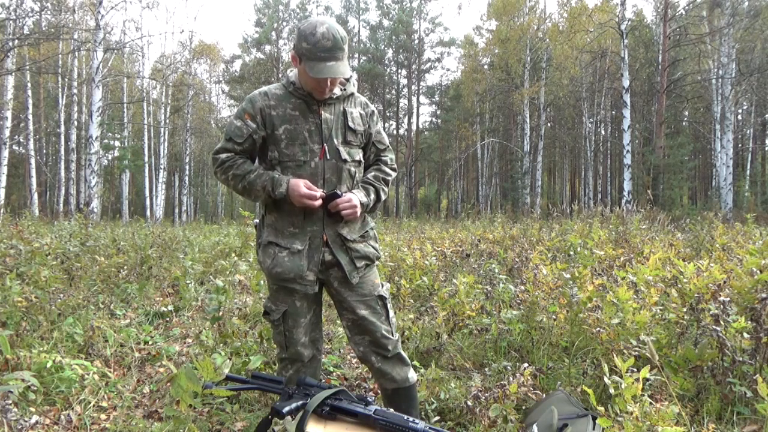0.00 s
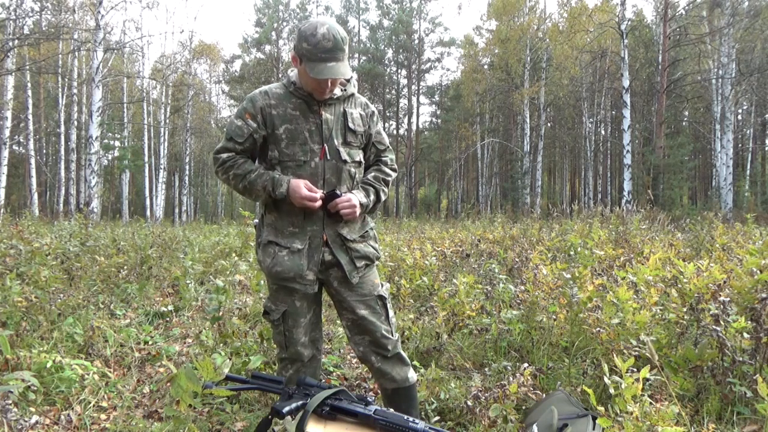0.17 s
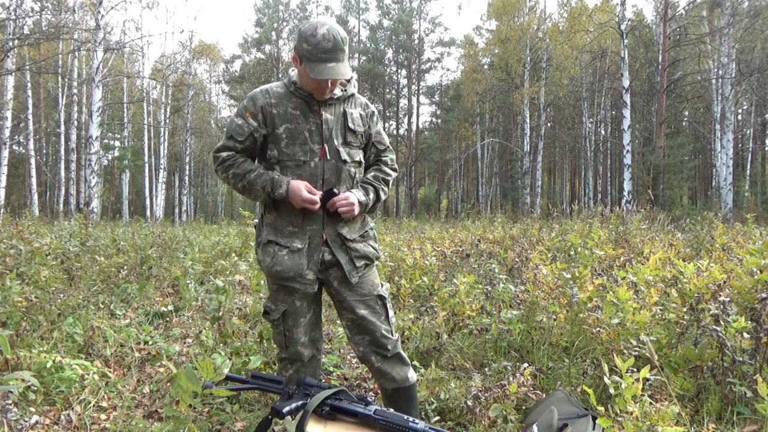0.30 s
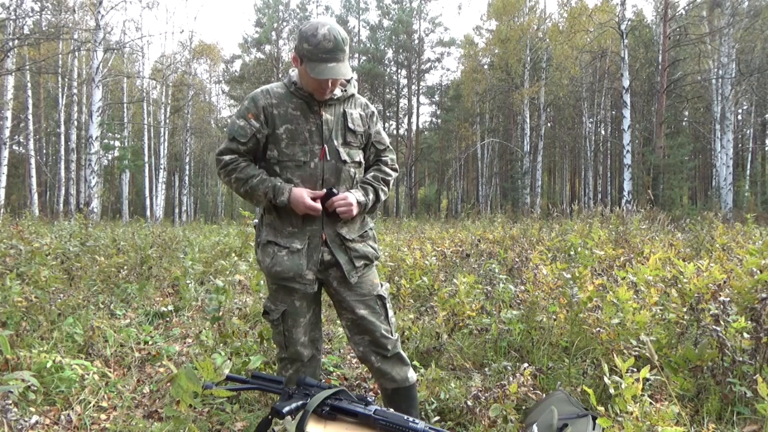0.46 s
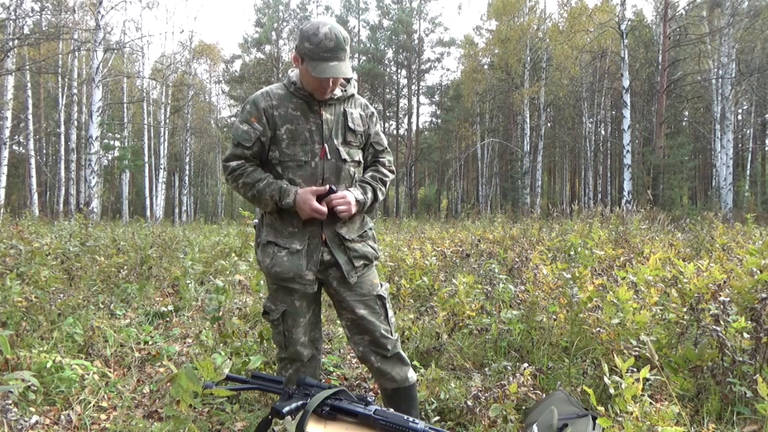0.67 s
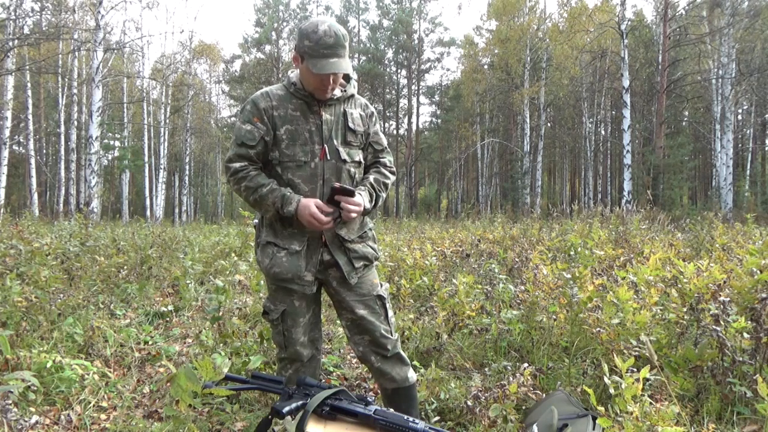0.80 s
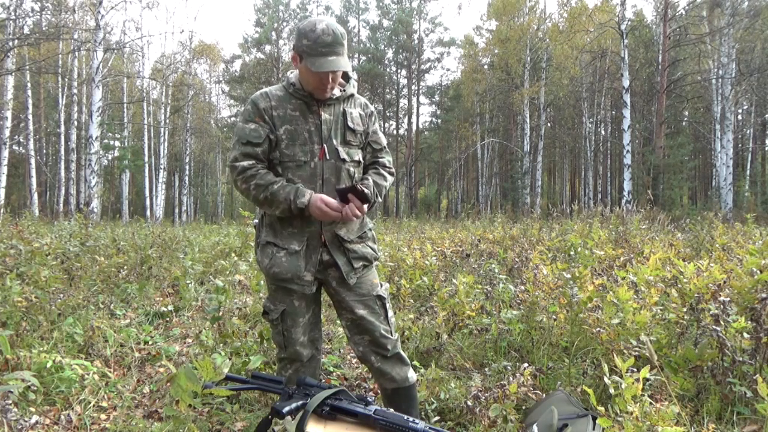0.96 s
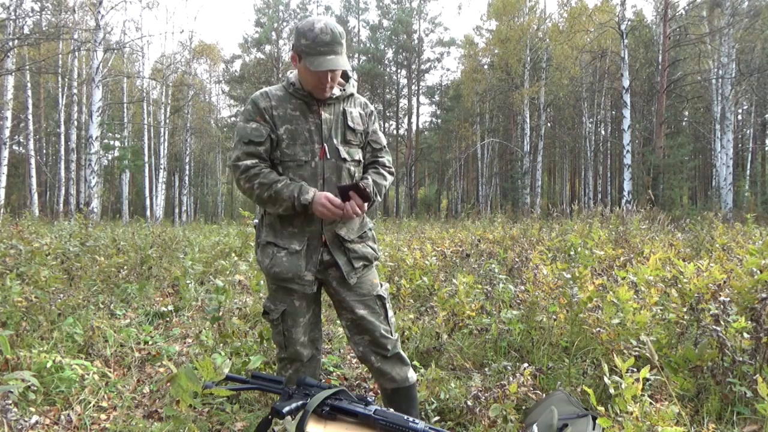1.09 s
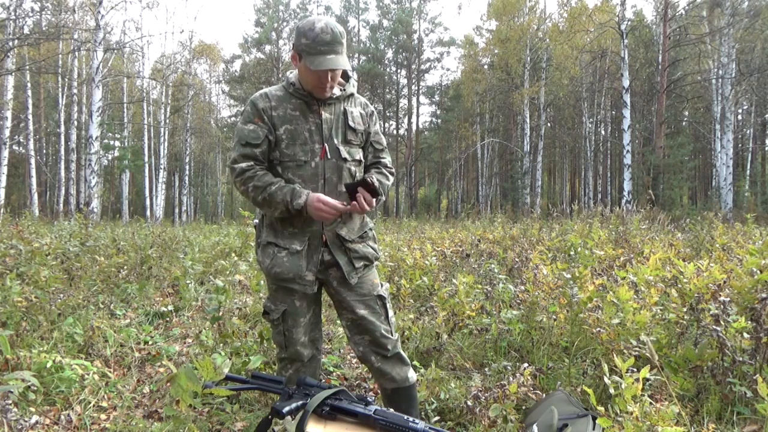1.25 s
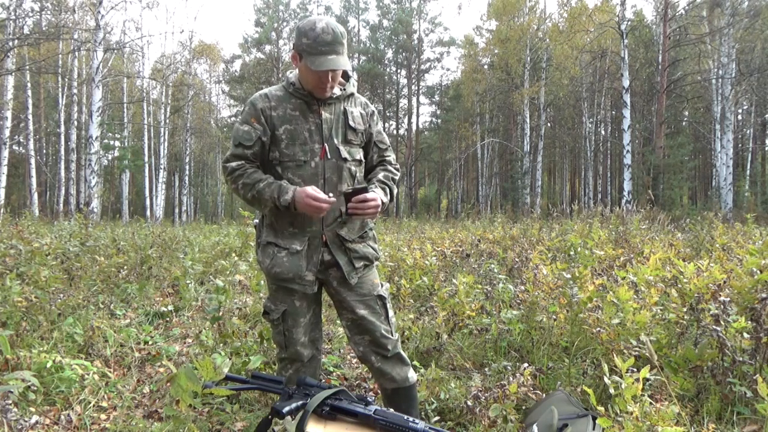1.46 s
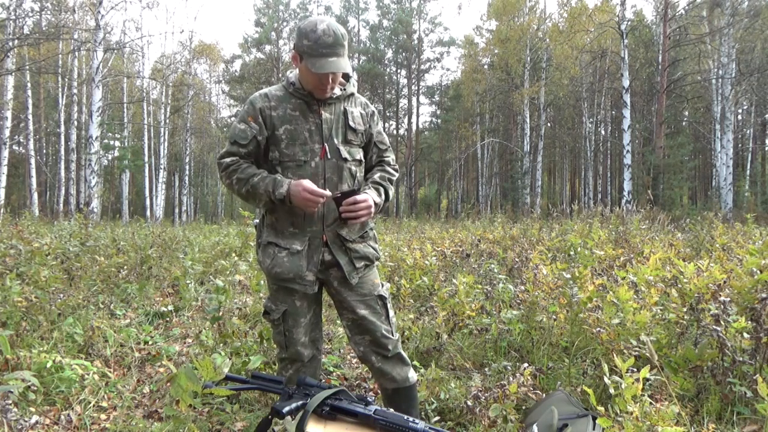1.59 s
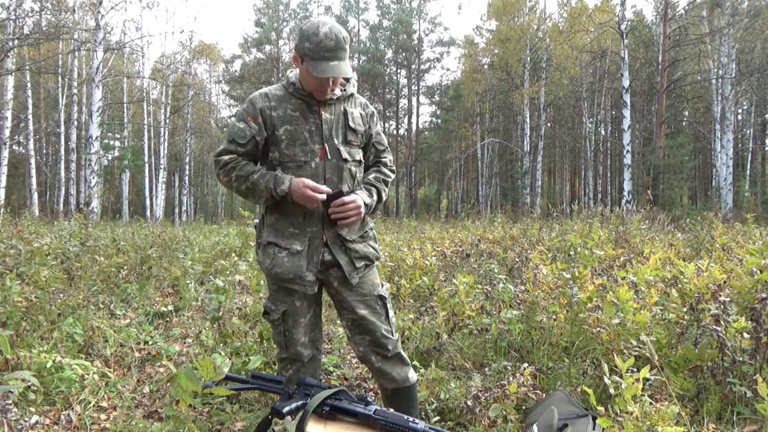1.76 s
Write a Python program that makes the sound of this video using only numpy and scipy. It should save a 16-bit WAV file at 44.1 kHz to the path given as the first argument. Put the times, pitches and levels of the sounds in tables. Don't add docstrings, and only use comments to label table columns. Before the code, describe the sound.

A brass cartridge is pressed into a steel magazine: small scrapes and hollow knocks, then four hard bright snaps in quick succession, followed by soft jacket rustle and tiny dry ticks, in a quiet forest clearing, a few metres from the microphone.

```python
import sys
import numpy as np
from scipy import signal
from scipy.fft import rfft, irfft, next_fast_len
from scipy.io import wavfile
from scipy.ndimage import map_coordinates

SR = 44100
rng = np.random.default_rng(int(sys.argv[2]) if len(sys.argv) > 2 else 0)


def attenuation_scalar(level_db):
    decades = np.asarray(level_db, float) / 20
    return 10 ** decades


def unload_audio(sound):
    columns = np.transpose(np.atleast_2d(sound))
    steps = np.round(np.clip(columns, -1, 1) * 32767)
    wavfile.write(sys.argv[1], SR, steps.astype(np.int16))


N = 79380
RING_S = np.arange(SR // 20) / SR
BOX_LOW_HZ = 260

# frequency in Hz, level in dB, t60 in seconds.
BRIGHT_MODES = [(1130, -10, .016), (1950, -10, .01), (2800, -6, .009), (3900, -6, .009), (4800, -6, .007),
                (5700, -8, .006), (6300, -4, .006), (7400, -2, .007), (8600, -3, .007), (10200, -6, .006),
                (11800, -10, .005), (13600, -14, .005)]


def unit(x):
    return x / np.sqrt(np.mean(x ** 2) + 1e-20)


def along(points, hz):
    f, v = np.transpose(points)
    return np.interp(np.log(hz + 1), np.log(f + 1), v)


def wobble(rate):
    knots = rng.standard_normal(int(N * rate / SR) + 4)
    return map_coordinates(knots, [np.arange(N) * rate / SR])


def filtered(x, response):
    m = next_fast_len(N + SR // 2)
    return irfft(rfft(x, m) * response(np.fft.rfftfreq(m, 1 / SR)), m)[..., :N]


def no_bass(x, low_hz):
    return signal.sosfilt(signal.butter(N=3, Wn=low_hz, btype="high", fs=SR, output="sos"), x)


def grit(per_s, spread_db):
    when, sign, size = rng.random((3, N))
    return (when < per_s / SR) * np.sign(sign - .5) * attenuation_scalar(-spread_db * np.log(size + 0.065))


def stereo(pair, spectrum):
    # frequency in Hz, left-right likeness (0-1).
    likeness = [(40, .999), (90, .99), (180, 0.91), (400, 0.92), (800, 0.55), (2000, 0.46), (6000, 0.76),
                (12000, 1)]

    def response(hz):
        turn = np.arccos(np.clip(along(likeness, hz), 0, 1)) / 2
        return attenuation_scalar(along(spectrum, hz)) * [np.cos(turn), np.sin(turn)]

    mid, side = filtered(pair, response)
    return unit(np.array([mid + side, mid - side]))


def ring(hz, db, t60):
    hz, db, t60 = hz[:, None], db[:, None], t60[:, None]
    rise = 1 - np.exp(-RING_S * hz / .3)
    return attenuation_scalar(db - 60 * RING_S / t60) * rise * np.sin(2 * np.pi * hz * RING_S)


def crack(db):
    t60_s = .006
    return attenuation_scalar(db - 60 * RING_S / t60_s) * np.diff(rng.standard_normal(len(RING_S) + 1))


def place(out, start_s, wave):
    out[..., round(start_s * SR):][..., :wave.shape[-1]] += wave


def forest():
    # frequency in Hz, level in dB per Hz.
    leaf_spectrum = [(15, -29), (25, -11), (65, -2), (192, -11), (290, -4), (510, -4.5), (585, -8.5),
                     (637, -7), (1500, -14), (1950, -38), (3300, -120)]
    # frequency in Hz, level in dB per Hz.
    hiss_spectrum = [(760, -8), (1300, -10.5), (3510, -1.5), (4330, -5), (4710, -4), (5130, -7),
                     (15700, -15), (15950, -40)]
    leaf_db = -60 + .6 * (wobble(6.77) + wobble(16.6))
    hiss_db = -63.5 - 2.5 + 0.18 * wobble(9.4)
    leaves = attenuation_scalar(leaf_db) * stereo(rng.standard_normal((2, N)), leaf_spectrum)
    return leaves + attenuation_scalar(hiss_db) * stereo(rng.standard_normal((2, N)), hiss_spectrum)


def drive():
    start_s, turn_s = .0155, .08
    half = np.arange(int(N / SR / turn_s * 2))
    chance, out = rng.standard_normal((len(half), 3)), np.zeros(N + SR)
    tick = ring(4850 + 0 * half, -58 + 1.5 * chance[:, 0], .016 + 0 * half)
    clack = ring(3500 * (1 + 0.032 * chance[:, 1]), -53.5 + 1.7 * chance[:, 2], .009 + 0 * half)
    for k, wave in enumerate(tick + clack * (half[:, None] % 2 == 0)):
        place(out, start_s + k * turn_s / 2, wave)
    return out[:N]


def cloth():
    # time in seconds, level in dB.
    movement = [(0, -66), (.08, -65), (.15, -68.5), (.3, -61), (.38, -67), (.5, -57), (.675, -59),
                (.76, -54.5), (.84, -63), (.92, -64.5), (1.0, -60.5), (1.09, -63), (1.15, -69),
                (1.21, -65.5), (1.3, -68), (1.451, -66), (1.55, -68), (1.8, -68.5)]
    # frequency in Hz, level in dB per Hz.
    fibre_spectrum = [(710, -6), (1200, -10), (2010, -1), (2380, -3), (3280, -4), (5260, -8), (8700, -9.5),
                      (15500, -23.5)]
    s, db = np.transpose(movement)
    move_db = np.interp(np.arange(N) / SR, s, db)
    fibres = np.array([unit(grit(2500, 0)) + rng.standard_normal(N) for _ in range(2)])
    sway_db = .5 * wobble(14.0) + 1.16 * wobble(62.2)
    return attenuation_scalar(move_db + sway_db) * stereo(fibres, fibre_spectrum)


def swishes():
    # start in seconds, length in seconds, level in dB, centre in Hz.
    brushes = [
        (.67, 0.14, -63, 8800),
        (1.18, 0.068, -70.5, 11000),
        (1.412, 0.0066, -59, 10000),
        (1.467, .013, -59.5, 9200),
        (.75, 0.016, -60, 6800),
    ]
    width_octaves = .4
    out, t = np.zeros(N), np.arange(N) / SR
    for s, length_s, db, hz in brushes:
        band = filtered(rng.standard_normal(N),
                        lambda f: np.exp(-(np.log2((f + 1) / hz) / width_octaves) ** 2))
        swell = np.sin(np.pi * np.clip((t - s) / length_s, 0, 1))
        out += swell * attenuation_scalar(db + 2.5 * wobble(150)) * unit(band)
    return out


def ticks():
    # start in seconds, strength in dB, centre in Hz.
    touches = [(0.068, -53, 3960), (.2005, -46, 3740), (0.328, -43, 3970), (0.4555, -37, 4830),
               (.9965, -42, 3640), (1.07, -44.5, 8600), (1.3, -49, 6600), (1.4774, -45.5, 4320),
               (1.473, -50, 6200), (1.463, -51, 4700), (.553, -43, 3100), (0.736, -46, 3950)]
    cycles, rise_s, snap_db = 45, .0005, -18
    out = np.zeros(N + SR)
    for s, db, hz in touches:
        noise = rng.standard_normal((2, len(RING_S)))
        wave = np.sin(2 * np.pi * hz * RING_S + 0.41 * np.cumsum(noise[0])) + attenuation_scalar(snap_db) * noise[1]
        rise = 1 - np.exp(-RING_S / rise_s)
        place(out, s, attenuation_scalar(db - 60 * RING_S * hz / cycles) * rise * wave)
    return out


def slides():
    # start in seconds, end in seconds.
    early_spans = [(.091, .104), (.214, .226), (.226, .236), (.28, .3), (.301, .321), (.321, .334),
                   (.421, .43)]
    late_spans = [(.433, .451), (.451, .5), (.547, .585), (.612, .619), (.621, .645), (.65, .662),
                  (.663, .672)]
    # level in dB, fade in dB over the slide.
    strokes = [(-55.5, -5.5), (-63, -14), (-44.5, 0), (-42.5, 9.5), (-46.5, -8), (-48, 17), (-37, 16),
               (-39.5, 5), (-45, 22), (-61, 1), (-50, -12), (-42.5, 20), (-50, -1), (-35, 44)]
    # frequency in Hz, gain in dB.
    colour = [(1100, 17.5), (3000, 18.5), (7000, 8), (14000, -24)]
    damping, bare_slip_db = .6, -19
    t, level = np.arange(N) / SR, np.zeros(N)
    for (s, end), (db, fade_db) in zip(early_spans + late_spans, strokes):
        u = (t - s) / (end - s)
        edges = np.clip(np.minimum(u, 1 - u) * 8, 0, 1)
        level += attenuation_scalar(db - fade_db * np.clip(u, 0, 1)) * edges
    hz, db, t60 = np.transpose(BRIGHT_MODES)
    body = ring(hz, db + along(colour, hz), t60 * damping).sum(0)
    slips = unit(grit(9000, 3)) * attenuation_scalar(0.93 * wobble(350)) * level
    ringing = signal.fftconvolve(slips, body / np.linalg.norm(body))[:N]
    return ringing + attenuation_scalar(bare_slip_db) * np.diff(slips, prepend=0)


def knocks():
    # start in seconds, strength in dB, ring in Hz, t60 in seconds.
    hits = [(0.0679, -41, 2040, 0.0084), (0.0987, -37.5, 1065, 0.019), (0.2292, -25.5, 1142, 0.018),
            (.229, -30.5, 394, 0.015), (.229, -32.5, 657, 0.014), (0.301, -31, 1200, 0.01),
            (0.3192, -24, 1180, 0.0044), (.4335, -32.5, 970, 0.018), (.433, -40, 1240, 0.0093),
            (.4515, -29, 660, 0.016), (0.453, -27, 415, 0.014), (.5468, -26, 1140, 0.013),
            (0.545, -36.5, 335, 0.028), (0.619, -29.5, 1160, 0.021), (0.619, -36, 380, 0.025),
            (.6315, -24.5, 1170, 0.0097), (0.317, -42.5, 344, 0.045), (.2262, -38.5, 1000, .03),
            (0.2258, -34.5, 5720, .012), (.6175, -27.5, 1160, .012), (.62, -38.5, 850, 0.016),
            (0.091, -44, 2010, .012), (1.4113, -39, 3500, .004), (1.4113, -45, 2300, .006),
            (.6233, -25, 7500, .008), (.6214, -27, 6000, .006), (.5397, -35, 3900, .003),
            (.3182, -37, 2900, .004), (.613, -40, 2200, .02), (.287, -42, 1100, 0.013),
            (1.477, -50, 800, .008), (.6244, -33, 2500, .03), (.5462, -36, 13200, .004),
            (.6628, -40, 13100, .004), (.5462, -32, 4700, .005), (.3185, -41, 780, .015),
            (0.6632, -27, 1115, 0.017), (0.6636, -26, 378, 0.018)]
    out = np.zeros(N + SR)
    start, db, hz, t60 = np.transpose(hits)
    for s, wave in zip(start, ring(hz, db, t60)):
        place(out, s, wave)
    return out


def clicks():
    early_s = [.0995, .2257, .2303, .282, .3005, .3182, .4508]
    late_s = [.5398, .6027, .6172, .6222, .631, .652]
    # strength in dB, main ring in Hz, its t60 in seconds, bright modes in dB.
    strikes = [(-40.5, 4500, 0.0067, -13), (-25.5, 3495, 0.012, -11), (-34, 3500, 0.0059, -4.5),
               (-44, 1900, .01, -15), (-29.5, 3180, 0.0099, -16), (-32, 4340, 0.0056, -10),
               (-24, 3100, .009, -12), (-28, 2000, 0.005, -18), (-21.5, 2630, 0.0029, -22),
               (-16.5, 2700, 0.0055, -24), (-28.5, 7300, 0.011, 3), (-21, 2000, 0.0088, -31),
               (-38, 1600, 0.0066, -20)]
    detune, scatter_db, crack_db = .025, 2, -10
    out = np.zeros((2, N + SR))
    hz, level, t60 = np.transpose(BRIGHT_MODES)
    for s, (db, main_hz, main_t60, edge_db) in zip(early_s + late_s, strikes):
        chance = rng.standard_normal((3, len(hz) + 1))
        mode_hz = np.append(hz * (1 + detune * chance[2, 1:]), main_hz)
        mode_db = np.append(level + edge_db + scatter_db * chance[0, 1:], 0)
        modes = ring(mode_hz, mode_db, np.append(t60, main_t60))
        mid = modes.sum(0) + crack(edge_db + crack_db)
        place(out, s, attenuation_scalar(db) * np.array([mid, chance[1] @ modes]))
    return out


def snaps():
    # start in seconds, strength in dB, ring length factor, crack in dB.
    blows = [
        (.432, -11, 1.3, -26),
        (.546, -18.5, .95, -17),
        (0.62, -13, 1.23, -18),
        (.6626, -22.5, .9, -17),
    ]
    # frequency in Hz, width in Hz, level in dB.
    seat_modes = [(1910, 210, -15.5), (2830, 280, 0), (3880, 294, 0.5), (4730, 150, -13.5),
                  (6300, 220, -13), (7150, 190, -10.5), (7930, 740, -10), (8600, 640, -13),
                  (9500, 320, -20), (10170, 220, -15.5), (11200, 190, -31), (14000, 600, -26)]
    lip_modes = [(1950, 170, -8), (2950, 260, 0.5), (3800, 180, -6.5), (5300, 410, -13.5), (6060, 320, -12),
                 (7400, 380, -9), (7900, 250, -14), (8800, 320, -18), (9860, 550, -10.5),
                 (11500, 670, -12.5), (13400, 410, -24)]
    push_modes = [(2076, 274, -0.5), (2440, 420, -6), (3500, 330, -8), (4430, 410, -8.5),
                  (4940, 400, -11.5), (6100, 320, -12), (7150, 320, -14.5), (8460, 530, -10),
                  (9900, 420, -12), (10700, 400, -18), (11900, 500, -24), (13000, 500, -28)]
    drop_modes = [(2210, 250, 0.5), (3090, 290, -1), (3850, 210, -1), (4640, 190, -9), (5730, 410, -8.5),
                  (7100, 320, -12), (7680, 190, -11), (8400, 510, -5), (9500, 570, -13), (10600, 170, -19),
                  (11100, 200, -26)]
    mode_signs = [1, -1, 1, -1]
    gain_db = 1.6
    out = np.zeros((2, N + SR))
    grips = [seat_modes, lip_modes, push_modes, drop_modes]
    for (s, db, length, crack_db), peaks, sign in zip(blows, grips, mode_signs):
        hz, width, level = np.transpose(peaks)
        t60 = length * np.log(1000) / np.pi / width
        start = width * sign ** np.arange(len(hz)) / width[np.argmax(level)]
        modes = ring(hz, level, t60) * start[:, None]
        mid = modes.sum(0) + crack(crack_db)
        side = rng.standard_normal(len(hz)) @ modes
        place(out, s, attenuation_scalar(db + gain_db) * np.array([mid, side]))
    return out


def contacts():
    out = no_bass(snaps() + clicks(), 1100)
    out += knocks()
    out[0] += ticks()
    return no_bass(out[:, :N], BOX_LOW_HZ)


def clearing(x):
    # frequency in Hz, t60 in seconds.
    decay = [(300, 0.064), (3000, 0.08), (12000, 0.083)]
    hz, t, z = signal.stft(rng.standard_normal((2, SR // 2)), SR, nperseg=256)
    tail = signal.istft(z * attenuation_scalar(-60 * t / along(decay, hz)[:, None]), SR, nperseg=256)[1]
    tail = tail * 1.7 + tail.mean(0)
    late = np.pad(x, (130, 0))[None]
    return signal.fftconvolve(late, tail / np.linalg.norm(tail[0]), axes=1)[:, :N]


def scene():
    pan_db, side_db, clearing_db, around_pan_db, mic_top_hz = 0.53, -27, -22, .15, 13900
    mid, side = contacts()
    mid = mid + no_bass(slides(), BOX_LOW_HZ * 2)
    near = mid * attenuation_scalar([[pan_db], [-pan_db]]) + attenuation_scalar(side_db) * side * [[1], [-1]]
    near = near + attenuation_scalar(clearing_db) * clearing(mid)
    soft_top = signal.butter(N=8, Wn=mic_top_hz, fs=SR, output="sos")
    around = cloth() + swishes() + forest() + drive()
    return signal.sosfilt(soft_top, near) + around * attenuation_scalar([[around_pan_db], [-around_pan_db]])


def roll_off(x):
    return signal.sosfilt(signal.butter(12, 16640, fs=SR, output="sos"), x)


def record(dry):
    top_hz = 16600
    return roll_off(filtered(dry, lambda hz: hz < top_hz))


dry = scene()
out = record(dry)
unload_audio(out)
```